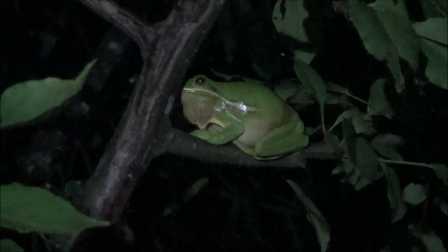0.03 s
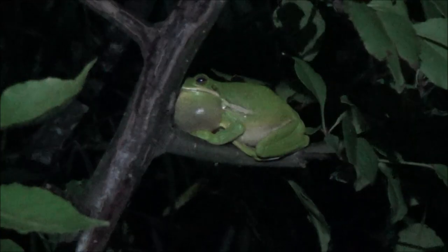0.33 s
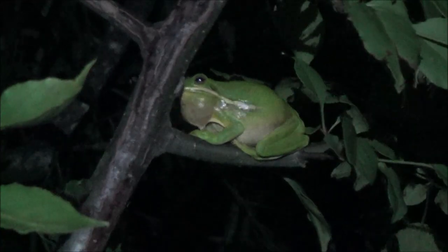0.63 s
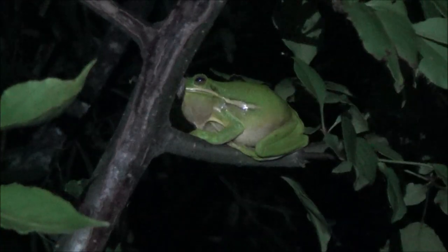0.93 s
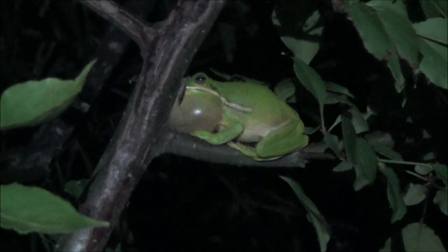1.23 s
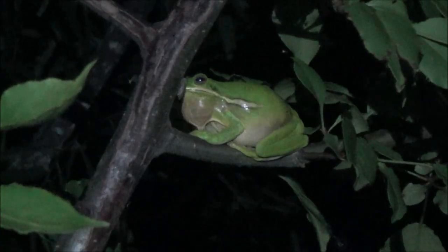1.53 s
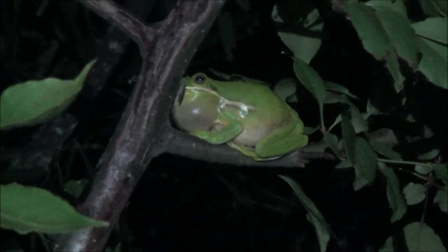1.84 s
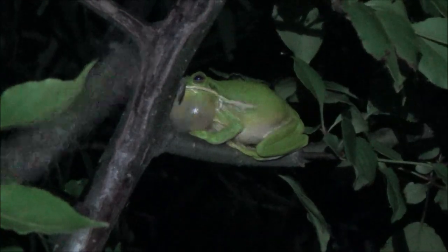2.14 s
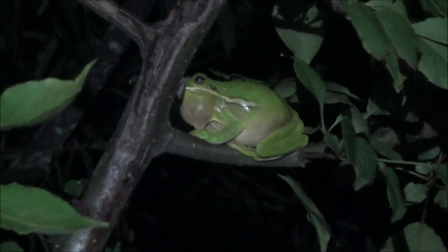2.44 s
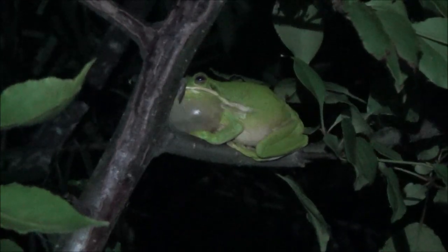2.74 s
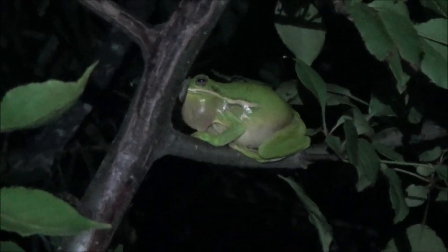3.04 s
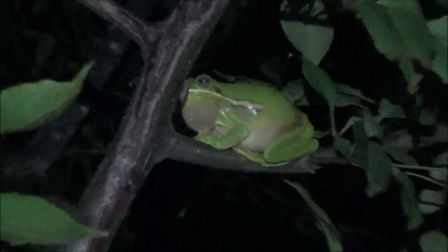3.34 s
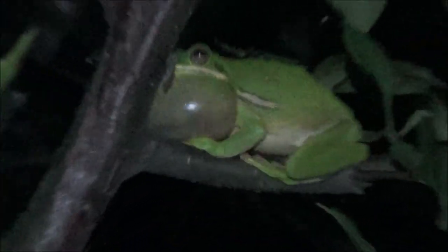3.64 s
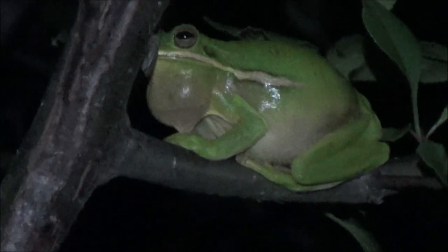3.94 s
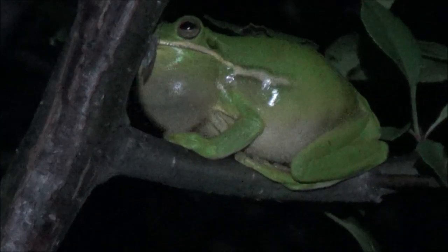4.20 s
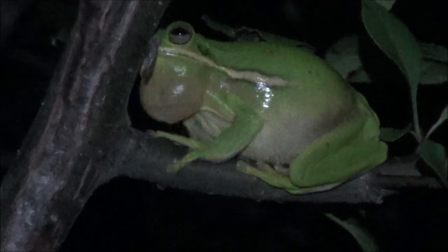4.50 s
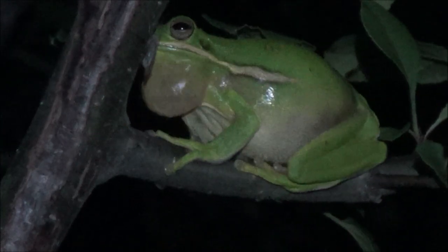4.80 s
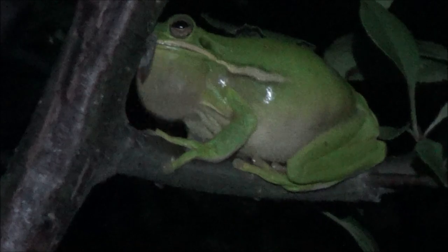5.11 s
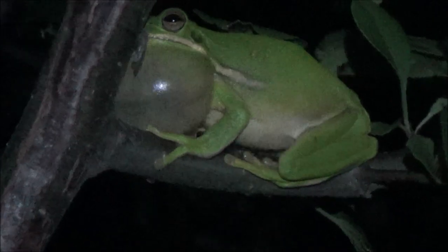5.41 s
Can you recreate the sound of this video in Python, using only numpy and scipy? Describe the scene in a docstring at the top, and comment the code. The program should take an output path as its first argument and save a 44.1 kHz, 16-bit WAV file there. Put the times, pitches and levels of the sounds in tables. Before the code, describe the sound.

A tree frog honks close to the microphone in woods at night, far louder than anything else. Each honk lasts about a tenth of a second: a stuttering start, a harsh nasal buzz and a slightly falling end, followed by a faint ringing tail from the trees. The first two, at about 0.2 and 0.7 seconds, are the roughest and a little louder. Cleaner honks follow evenly at about 1.2, 1.6, 2.1, 2.6, 3.1, 3.5 and 4.0 seconds. After a short gap, two more come at 4.9 and 5.3 seconds. A small cluster of quiet, dry twig ticks sounds near 2.9 seconds, and a single one at 3.7. Throughout, faint high insect trilling continues over soft hiss, a distant rumble and a low hum, until the sound ends at about 5.6 seconds.

```python
"""Woods at night: a green tree frog honks eleven times from a branch close by.
Each honk stutters open on the tone of the vocal cords, locks into a fast buzz of pulses that ring
the throat and vocal sac, and ends on the free, falling cord tone. The trees return a faint tail.
Behind it, insects trill with their wings over a far rumble and low hum; a few twigs tick."""
import sys
import numpy as np
from scipy import signal
from scipy.fft import rfft, irfft, next_fast_len
from scipy.io import wavfile
from scipy.ndimage import uniform_filter1d, map_coordinates

SR = 44100
rng = np.random.default_rng(int(sys.argv[2]) if len(sys.argv) > 2 else 0)


def dump_mix(stems):
    """Bounce the given channels to the path in sys.argv[1] as a 16-bit WAV at rate SR."""
    frames = np.atleast_2d(stems).T  # one column per channel
    limited = np.clip(frames, -1, 1)  # hard clip at full scale
    pcm = np.round(limited * 32767).astype(np.int16)
    wavfile.write(sys.argv[1], SR, pcm)


N = 245195
TIME_S = np.arange(N) / SR

# honks: start_s, lock_s, release_s, level_db, roughness (0-1), close_hz, tick_lead_s
# the buzz runs from lock_s to release_s, both counted from start_s
HONKS = [ (0.1826, 0.033, 0.063, -25.5, 0.74, 810, 0.02), (0.6622, 0.034, 0.079, -24.5, 0.53, 906, .012),
         (1.1589, 0.0275, 0.083, -23.5, 0.16, 796, 0.011), (1.636, 0.022, 0.082, -23.5, 0.03, 794, 0.013),
         (2.11, 0.026, .087, -23.5, .2, 796, 0.015), (2.573, 0.015, 0.093, -23, 0.11, 858, 0.014),
         (3.073, .015, 0.099, -23, 0.05, 837, 0.016), (3.5256, 0.015, 0.097, -23, .06, 840, .005),
         (3.977, 0.0075, 0.094, -23, 0.09, 820, 0.0066), (4.85, .013, .1, -24.5, .06, 810, 0.011),
         (5.309, .018, .097, -23.5, 0.06, 820, 0.0076)]
# harmonics of the free cords, fundamental first: opening_db, closing_db
CORD_HARMONICS = [(0.5, -5), (0, -6.5), (-6, 3.5), (-7.5, -14.5), (-17, -19.5), (-17.5, -27),
                  (-54.5, -29.5), (-67.5, -28), (-38, -37), (-34, -37), (-37.5, -41), (-46, -41)]


def amp(db):
    return 10 ** (np.asarray(db) / 20)


def unit_rms(x):
    return x / np.sqrt(np.mean(x ** 2) + 1e-20)


def at_hz(points, hz):
    """Interpolate (hz, value) points on a log axis."""
    knots_hz, values = np.transpose(points)
    return np.interp(np.log(hz + 1), np.log(knots_hz + 1), values)


def at_time(points, t):
    """Interpolate (time_s, value) points."""
    return np.interp(t, *np.transpose(points))


def wobble(rate_hz, size=N):
    """Smooth random curve, rate_hz knots a second."""
    return map_coordinates(rng.standard_normal(size // 8 + 4), [np.arange(size) * rate_hz / SR + 2])


def step(t, width_s):
    """Soft rise from 0 to 1 around t = 0."""
    return .5 + .5 * np.tanh(t / width_s)


def filtered(x, response):
    """Apply the complex frequency response(hz)."""
    size = 2 * next_fast_len(N // 2 + SR // 4)
    return irfft(rfft(x, size) * response(np.fft.rfftfreq(size, 1 / SR)), size)[..., :N]


def ring(gain, size=2048):
    """Minimum-phase impulse response shaped by gain(hz), unit energy."""
    cepstrum = irfft(np.log(gain(np.fft.rfftfreq(size, 1 / SR)) + 1e-6))
    cepstrum[1:size // 2] *= 2
    cepstrum[size // 2 + 1:] = 0
    impulse = irfft(np.exp(rfft(cepstrum)))
    return impulse / np.linalg.norm(impulse)


def pulses(times_s, heights, size, half_taps=8):
    """Band-limited impulses at sub-sample times."""
    centre = times_s[:, None] * SR
    index = np.floor(centre).astype(int) + np.arange(1 - half_taps, half_taps + 1)
    shape = np.sinc(index - centre) * np.cos(np.pi * (index - centre) / (2 * half_taps)) ** 2
    return np.bincount(np.clip(index, 0, size - 1).ravel(), (heights[:, None] * shape).ravel(), size)


def stereo_noise(spectrum, patchy_db):
    """Coloured noise, rms 1, with patches of random gain."""
    # left-right likeness: freq_hz, correlation
    likeness = [(40, .97), (70, 1), (160, 0.86), (300, 0.65), (480, 0.11), (950, 0.26), (1890, 0.32),
                (3770, 0.2), (7520, 0.86), (15000, 1)]

    def mid_side_gain(hz):
        angle = np.arccos(np.clip(at_hz(likeness, hz), -1, 1)) / 2
        return amp(at_hz(spectrum, hz)) * [np.cos(angle), np.sin(angle)]

    bins = signal.stft(rng.standard_normal((2, N)), nperseg=512)[2]
    patches = uniform_filter1d(rng.standard_normal(bins.shape[1:]), size=5, axis=0)
    patches = unit_rms(uniform_filter1d(patches, size=14, axis=1))
    pair = signal.istft(bins * amp(patchy_db * patches), nperseg=512)[1][:, :N]
    mid, side = filtered(pair, mid_side_gain)
    return unit_rms(np.array([mid + side, mid - side]))


def night_air(hum_hz=77.2, hum_fade_db_per_s=2.5):
    """Far rumble, soft hiss, a slowly receding hum and thin steady tones."""
    # rumble spectrum: freq_hz, gain_db
    rumble_spectrum = [(13, -53.5), (22, -4.5), (48, -8.5), (81, -0.5), (129, -4.5), (160, -4.5),
                       (195, -5.5), (262, -3.5), (306, -3.5), (385, -18), (417, -14.5), (480, -27),
                       (620, -50.5), (1060, -120)]
    # rumble envelope: time_s, level_db
    rumble_level = [(0.9, -62), (1.65, -63.5), (2.29, -59.5), (4.3, -63), (4.66, -60), (5.06, -65.5),
                    (5.56, -63)]
    # hiss spectrum: freq_hz, gain_db
    hiss_spectrum = [(250, -4), (450, 1), (620, 0), (780, 3), (1100, -2.5), (1700, -5.5), (2400, -2),
                     (3500, -8.5), (7500, -15), (9300, -12.5), (12000, -17), (16000, -21.5)]
    # thin tones: pitch_hz, level_db, wander_hz
    thin_tones = [(396, -79.5, 2.1), (888, -74.5, 3), (4500, -73, 2.9), (15734, -86, 2)]

    def tone(hz, wander_hz):
        return np.sqrt(2) * np.sin(2 * np.pi * np.cumsum(hz + wander_hz * wobble(30)) / SR)

    rumble = amp(at_time(rumble_level, TIME_S) + 1.5) * stereo_noise(rumble_spectrum, patchy_db=.5)
    hiss = amp(-60.5) * stereo_noise(hiss_spectrum, patchy_db=.3)
    hum = amp(-64 - hum_fade_db_per_s * TIME_S + .89 * wobble(3.6)) * tone(hum_hz, wander_hz=1.6)
    tones = sum(amp(db + 1.3 * wobble(4.88)) * tone(hz, wander_hz) for hz, db, wander_hz in thin_tones)
    return rumble + hiss + hum + tones


def insects(wing_hz=5384, stroke_hz=70.9):
    """A far chorus, and one nearer insect whose wings ring at every stroke."""
    # chorus spectrum: freq_hz, gain_db
    chorus_spectrum = [(3600, -41), (4200, -11), (4500, -5), (4800, -4), (5400, -6), (5800, -5),
                       (6300, -19.5), (7200, -45)]
    # envelope of all insects: time_s, level_db
    envelope = [(1.3, -59.5), (3.69, -60), (4.1, -60.5), (4.79, -58), (4.9, -60), (5.56, -61)]
    stroke = np.cumsum(stroke_hz * (1 + .002 * wobble(7.8))) / SR % 1
    sag = .022 * stroke * (1 - stroke)  # the note falls within each stroke
    phase = 2 * np.pi * wing_hz / stroke_hz * (stroke + sag)
    trill = unit_rms(np.sin(np.pi * stroke) ** 2 * np.sin(phase)) * amp(.5 * wobble(25))
    chorus = stereo_noise(chorus_spectrum, patchy_db=-1)
    return amp(at_time(envelope, TIME_S) - 1) * (amp(-1) * chorus + amp(-6.5) * trill)


def larynx_tick(t, lead_s, t60_s=.025):
    """The larynx unsticks just before the honk; a later tick has more air behind it."""
    # tick strength: lead_s, level_db
    strength = [(.006, -11), (.011, -24)]
    age_s = np.maximum(t + lead_s, 0)
    modes = sum(amp(db) * np.sin(2 * np.pi * hz * age_s) for hz, db in [(880, 6.5), (1600, 4), (3100, -2)])
    return amp(at_time(strength, lead_s) - 60 * age_s / t60_s) * modes


def flap_times(t, rate_hz, release_s, stall_lead_s=.013, count=40):
    """The larynx flaps faster as pressure builds and slows as it runs out."""
    # flap speed: honk_time_s, share of rate_hz
    speed_up = [(0, .38), (.01, .42), (.018, .55), (.025, .76), (.031, .92), (.036, .99), (.044, 1.008),
                (.058, 1), (.1, .975)]
    stall = 1 - .44 * step(t - release_s + stall_lead_s, .002)
    flap_hz = rate_hz * at_time(speed_up, t) * stall * (t > 0)
    cycles = np.cumsum(flap_hz) / SR + 1e-6 * t  # strictly rising, so invertible
    return np.interp(np.arange(count), cycles, t)


def cord_tone(pitch_hz, harmonics_db, jitter, tilt_db_per_oct=0):
    """Freely swinging vocal cords: harmonics, each lagging the last."""
    phase = 2 * np.pi * np.cumsum(pitch_hz * (1 + jitter * wobble(712.5, len(pitch_hz)))) / SR
    return unit_rms(sum(amp(db + tilt_db_per_oct * np.log2(k)) * np.sin(k * phase - k * k * np.pi / 4)
                        for k, db in enumerate(harmonics_db, 1)))


def opening_puffs(t, flaps_s, lock_s, rough):
    """Slow puffs set the cords swinging; rough ones ring longer and brighter, and swell more."""
    rise_s, swell_db = .0019 + .0011 * rough, 6.5 * rough
    age = np.maximum(t[:, None] - flaps_s, 0) / rise_s
    puffs = np.sqrt(np.sum((age * np.exp(1 - age)) ** 3, axis=1))
    level = amp(np.interp(t, [0, lock_s], [-1 - swell_db, 2.5 + swell_db])) * step(lock_s - t, .0025)
    pitch_hz = np.full_like(t, np.interp(rough, [0, .3], [850, 812]))  # tighter cords in clean honks
    opening_db = np.transpose(CORD_HARMONICS)[0]
    tone = cord_tone(pitch_hz, opening_db, jitter=.0597 * (1.05 - rough), tilt_db_per_oct=3.8 * rough - 2.5)
    # the larynx rings briefly as each puff breaks through
    bite = np.sum(age * np.exp(1 - 1.72 * age), axis=1) * cord_tone(np.full_like(t, 3330), [0], jitter=.028)
    return level * (puffs * tone + amp(-14) * bite)


def throat(t, source):
    """Throat and sac resonances shift as the sac fills and sags again."""
    # resonances: slack_hz, full_hz, width_hz, slack_db, full_db
    resonances = [(820, 916, 213, -8, -7), (1118, 1092, 270, -5, -10), (1690, 1853, 250, -8.5, -10),
                  (2080, 2335, 208, -4.5, 0.5), (2517, 2620, 200, -7, -5.5), (2774, 2772, 132, -5, -4),
                  (3230, 3200, 730, -19.5, -19.5), (3630, 3720, 163, -22.5, -15),
                  (3930, 3960, 150, -22.5, -19.5), (4500, 4450, 290, -34, -28.5),
                  (5480, 6140, 3040, -38, -37.5), (5940, 6610, 360, -29.5, -31),
                  (7200, 8150, 240, -44, -38.5), (8000, 8700, 2300, -44.5, -47.5),
                  (13080, 11500, 810, -53, -52), (11500, 11500, 6000, -56.5, -70)]

    def gain(hz, slack):
        power = 0
        for slack_hz, full_hz, width_hz, slack_db, full_db in resonances:
            centre_hz = full_hz + slack * (slack_hz - full_hz)
            peak = amp(full_db + slack * (slack_db - full_db))
            power += (peak / (1 + (2 * (hz - centre_hz) / width_hz) ** 2)) ** 2
        return np.sqrt(power)

    moments_s = np.linspace(.005, .1, 7)
    slackness = np.minimum(np.exp(-(moments_s / .028) ** 2) + np.exp((moments_s - .102) / .011), 1)
    out = np.zeros(len(t))
    for slack, weights in zip(slackness, np.eye(len(moments_s))):
        crossfade = np.interp(t, moments_s, weights)
        out += signal.fftconvolve(source * crossfade, ring(lambda hz: gain(hz, slack)))[:len(t)]
    return out


def whistles(t):
    """Air whistles faintly through the larynx, gliding a little differently in each honk."""
    # glides: from_hz, to_hz, peak_s, half_length_s, level_db
    glides = [(6910, 6300, 0.058, 0.017, -20.5), (7600, 8350, 0.0323, 0.038, -31.5),
              (14950, 12300, 0.066, 0.02, -40.5)]
    out = np.zeros(len(t))
    for from_hz, to_hz, peak_s, half_length_s, db in glides:
        detune, late, offset_db = rng.standard_normal(3)
        hz = np.interp(t, [0, .1], [from_hz, to_hz]) * (1 + .006 * detune + .005 * wobble(250, len(t)))
        flutter_db = 2.5 * wobble(180, len(t))
        envelope = np.exp(-((t - peak_s - .0081 * late) / half_length_s) ** 2)
        out += amp(db + offset_db + flutter_db) * envelope * np.sin(2 * np.pi * np.cumsum(hz) / SR)
    return out


def buzz(t, flaps_s, lock_s, release_s, rate_hz, rough):
    """Flaps strike the throat, unevenly in rough honks and at both ends of every honk."""
    time_scatter, level_scatter = rng.standard_normal((2, len(flaps_s)))
    # push of the flanks: honk_time_s, level_db
    push = [(.015, 0), (.035, -1.5), (.058, -0.5), (.08, -0.64), (.1, -4)]
    unsteady = rough + .35 * (1 - step(flaps_s - .028, .004)) + .3 * step(flaps_s - release_s + .01, .003)
    strikes_s = flaps_s + .0002 * unsteady * time_scatter + .0012
    engaged = (amp(-9) + step(flaps_s - lock_s, .004) * (1 - amp(-14))) * step(release_s - flaps_s, .0023)
    heights = engaged * amp(at_time(push, flaps_s) + (.5 + 2 * unsteady) * level_scatter)
    train = pulses(strikes_s - t[0], heights, len(t)) * np.sqrt(SR / rate_hz)
    # air leaks past unevenly flapping cords
    flow = np.interp(t, flaps_s + .0016, engaged, left=0)
    leak_share = np.interp(t, flaps_s, np.minimum(.06 + .8 * unsteady, .55))
    leak = flow * leak_share * rng.standard_normal(len(t))
    # in the treble, steady hiss takes over from the flaps
    treble = signal.butter(4, 4600, "high", fs=SR, output="sos")
    hiss = signal.sosfiltfilt(treble, .75 * flow * rng.standard_normal(len(t)) - .45 * train)
    return throat(t, train + leak + hiss) + flow * whistles(t)


def closing_tone(t, release_s, pitch_hz, air_spent_s=.099, max_hold_s=.028):
    """The cords sing on alone, fluttering and sinking as they slacken; louder after a short buzz."""
    age_s = t - release_s
    sinking_hz = pitch_hz * np.exp(-3.6 * np.maximum(age_s, -.01))
    cutoff_s = min(air_spent_s, release_s + max_hold_s)
    start_db = -8 + 219 * (air_spent_s - release_s)
    decay_db = 110 * np.maximum(age_s, 0) + 1700 * np.maximum(t - cutoff_s, 0)
    level = step(age_s, .002) * amp(start_db - decay_db + wobble(399.5, len(t)))
    # little air is left after a long buzz: the tone narrows onto its second harmonic
    spent = np.clip((release_s - .075) / .02, 0, 1)
    closing_db = np.transpose(CORD_HARMONICS)[1] + 11 * spent * (np.arange(len(CORD_HARMONICS)) == 1)
    return level * cord_tone(sinking_hz, closing_db, jitter=.028)


def sac_radiation(hz, cut_hz=690):
    """So small a sac radiates little bass."""
    return amp(-10) + 1 - 1 / (1 + (hz / cut_hz) ** 18)


def frog(clean_rate_hz=284.6, rough_drop_hz=12.25):
    """All honks, radiated by the sac; rough ones pulse more slowly."""
    out = np.zeros(N + SR)
    t = np.arange(-SR // 40, SR // 6) / SR
    for start_s, lock_s, release_s, db, rough, close_hz, tick_lead_s in HONKS:
        rate_hz = clean_rate_hz - rough_drop_hz * rough
        flaps_s = flap_times(t, rate_hz, release_s)
        honk = larynx_tick(t, tick_lead_s)
        honk += opening_puffs(t, flaps_s, lock_s, rough)
        honk += buzz(t, flaps_s, lock_s, release_s, rate_hz, rough)
        honk += closing_tone(t, release_s, close_hz)
        out[round((start_s + t[0]) * SR):][:len(t)] += amp(db) * honk
    return signal.fftconvolve(out, ring(sac_radiation))[:N]


def direct_path(x):
    """A near source reaches left and right with unequal level and phase."""
    # balance: freq_hz, left_over_right_db
    balance = [(60, -3), (99, -8), (160, 1), (270, -8), (450, 3), (740, -2), (1220, 2), (2010, 1),
               (3330, -2.5), (5500, 3.5), (9080, 0), (15000, -0.5)]
    # phase: freq_hz, left_lead_rad
    phase_lead = [(0, 0.084), (260, 0.123), (860, 0.11), (1290, -0.3), (1550, -0.27), (2500, -0.46),
                  (3100, -0.075), (5940, 0.17), (6290, 0.1), (6550, -0.1), (7320, -0.0), (15500, 0.0)]

    def response(hz):
        left = amp(at_hz(balance, hz) / 2) * np.exp(.5j * at_hz(phase_lead, hz))
        return np.array([left, 1 / left])

    return filtered(x, response)


def tree_scatter(x):
    """The trees scatter back a coloured tail."""
    # tail bands: freq_hz, t60_s, gain_db
    bands = [(486, 0.32, -12.5), (900, 0.39, -4), (1500, 0.33, 0.5), (2100, 0.32, -5.5), (2560, 0.32, 5.5),
             (3500, 0.28, 2.5), (10000, 0.1, -5.5)]
    hz, t, bins = signal.stft(rng.standard_normal((2, SR // 2)), SR, nperseg=256)
    t60_s, colour_db = (at_hz(np.array(bands)[:, [0, column]], hz)[:, None] for column in (1, 2))
    tail = signal.istft(bins * amp(colour_db - 60 * t / t60_s), SR, nperseg=256)[1]
    return signal.fftconvolve(x[None], tail / np.linalg.norm(tail[0]), axes=1)[:, :N]


def distant_ring(centre_hz=2569, width_hz=26, delay_s=.078, hold_s=.3):
    """A narrow, flickering band hangs on after each honk; rough honks excite it less."""
    def narrow_band(hz):
        offset_hz = hz - centre_hz
        return 1 / (1 + 2j * offset_hz / width_hz) / (1 + (offset_hz / 250) ** 2)

    level = 0
    for start_s, _, _, _, rough, *_ in HONKS:
        age_s = TIME_S - start_s - delay_s
        level += amp(-11 * rough) * step(age_s, .02) * step(hold_s - age_s, .016)
    return amp(-62.5) * level * unit_rms(filtered(rng.standard_normal(N), narrow_band))


def twig_ticks():
    """Dry ticks among the twigs: short bursts of coloured noise."""
    # ticks: start_s, level_db, centre_hz, width_oct, t60_s
    ticks = [(2.883, -46, 2370, 0.29, 0.026), (2.895, -41.5, 2980, 1, .018),
             (2.903, -47.5, 2430, 0.54, 0.031), (2.926, -46.5, 1540, 0.87, 0.029),
             (3.709, -45.5, 1230, 0.96, 0.027)]
    out = np.zeros(N + SR)
    t = np.arange(SR // 10) / SR
    for start_s, db, centre_hz, width_oct, t60_s in ticks:
        colour = ring(lambda hz: 1 / (1 + (np.log2((hz + 1) / centre_hz) / width_oct) ** 2))
        burst = rng.standard_normal(len(t)) * amp(db - 60 * t / t60_s)
        out[round(start_s * SR):][:len(t)] += signal.fftconvolve(burst, colour)[:len(t)]
    return out[:N]


def scene():
    """The frog close by, its answer from the trees, and the night around it."""
    honks = frog()
    answer = amp(-28) * tree_scatter(honks) + distant_ring()
    return direct_path(honks) + answer + twig_ticks() + insects() + night_air()


def record(dry, silence_s=.072, boost_db=9.5, settle_s=.42, top_hz=15900):
    """After a brief silence the sound enters loud and settles; the top treble is cut."""
    settling = amp(boost_db * np.exp(-TIME_S / settle_s))
    return filtered(dry * settling * step(TIME_S - silence_s, .002), lambda hz: hz < top_hz)


dry = scene()
out = record(dry)
dump_mix(out)
```